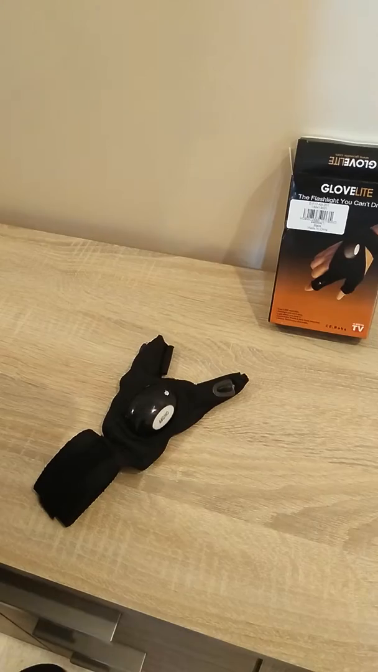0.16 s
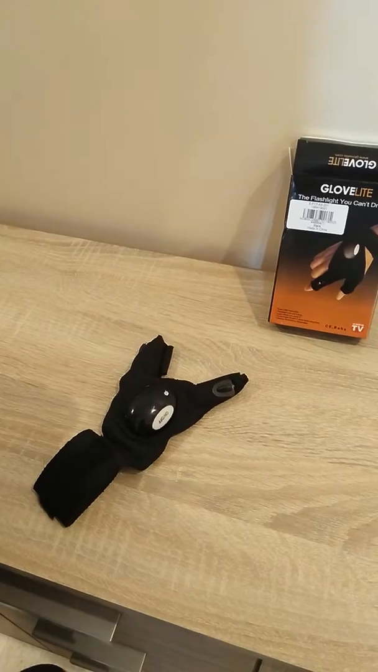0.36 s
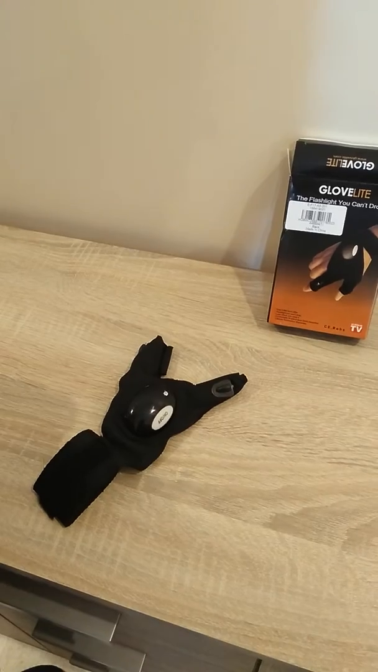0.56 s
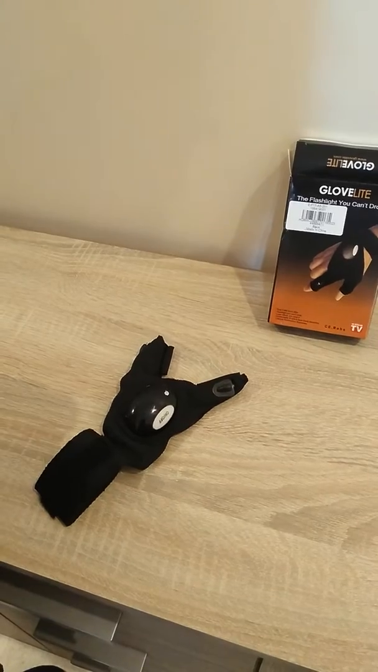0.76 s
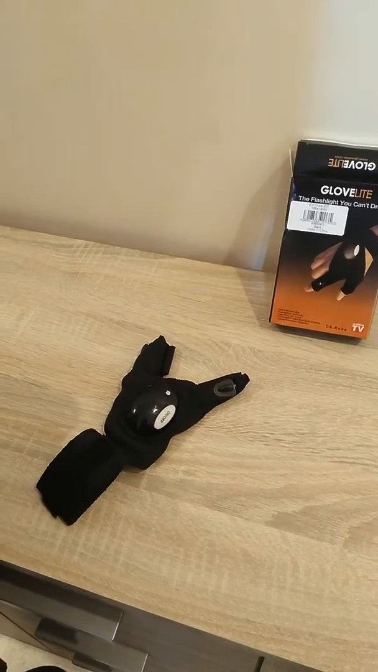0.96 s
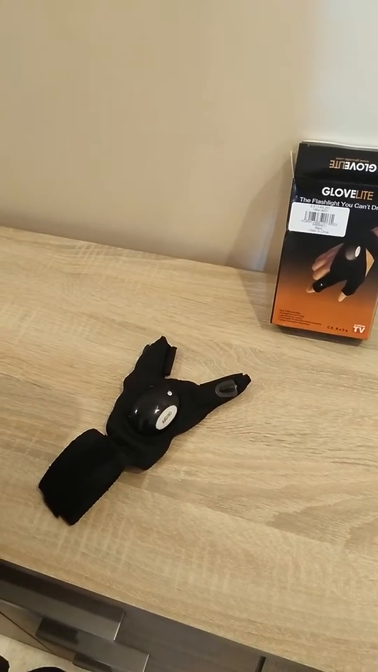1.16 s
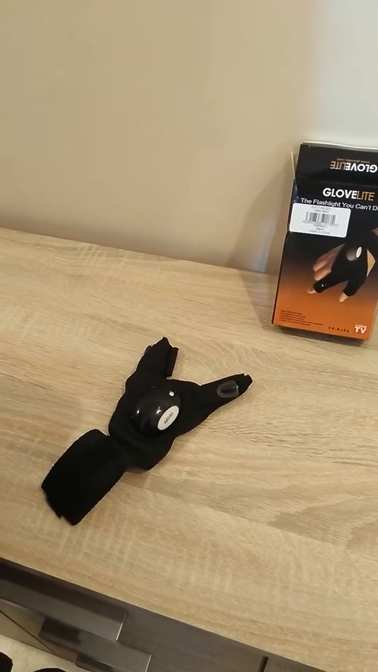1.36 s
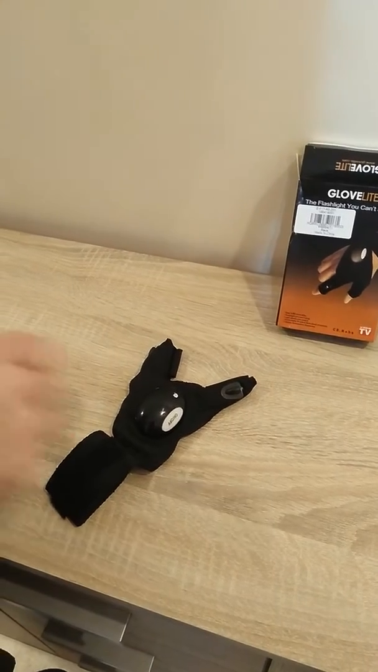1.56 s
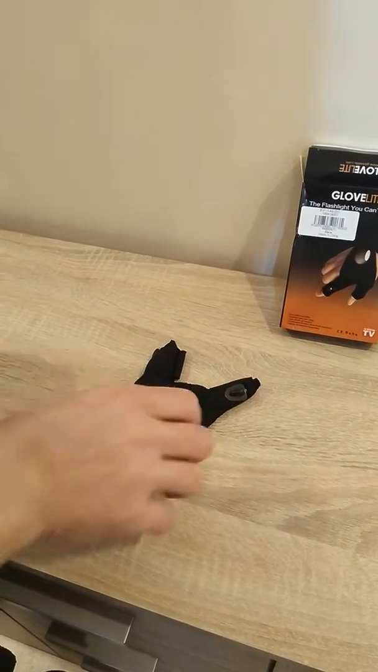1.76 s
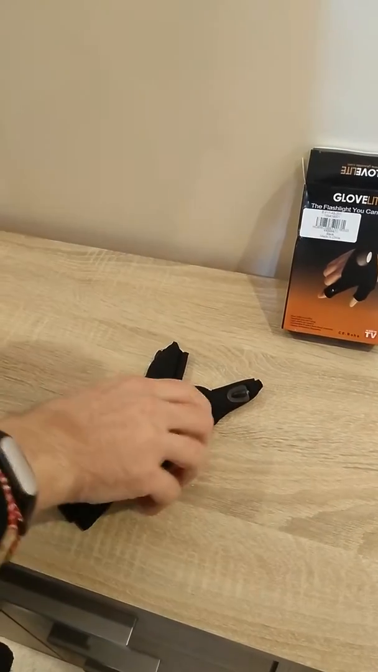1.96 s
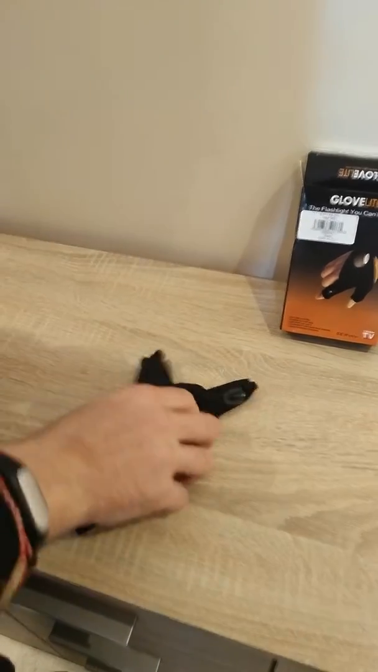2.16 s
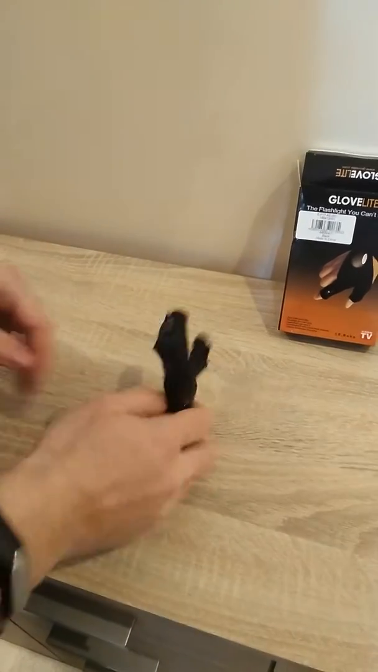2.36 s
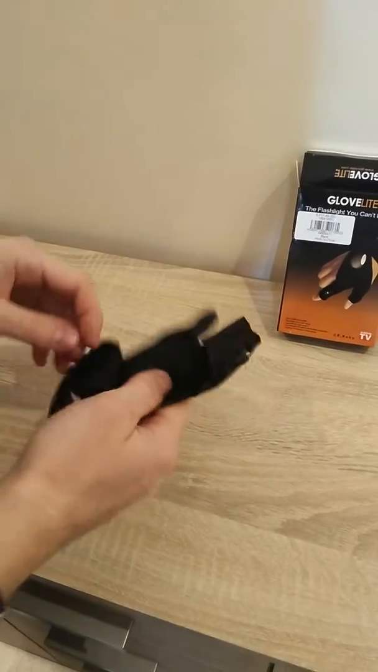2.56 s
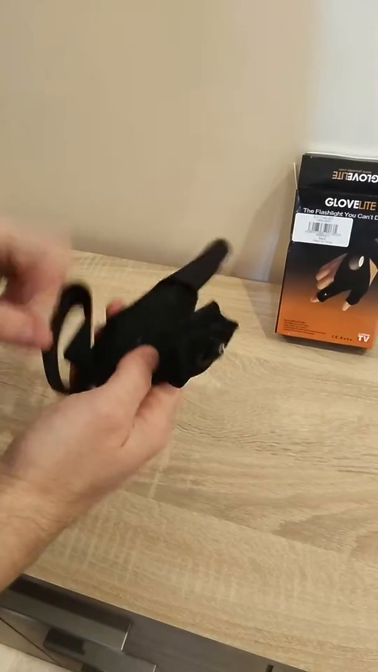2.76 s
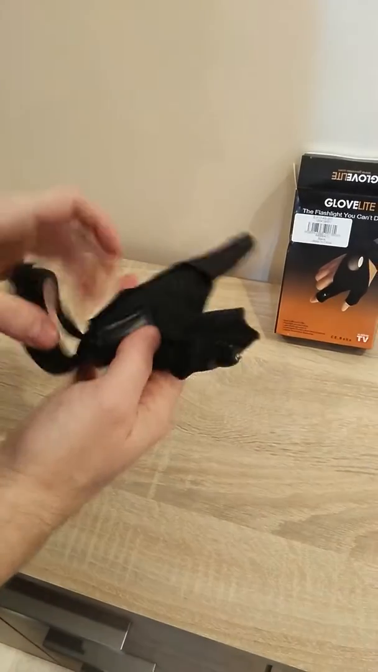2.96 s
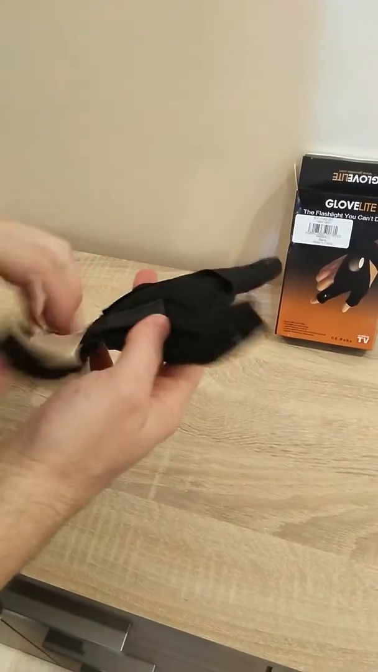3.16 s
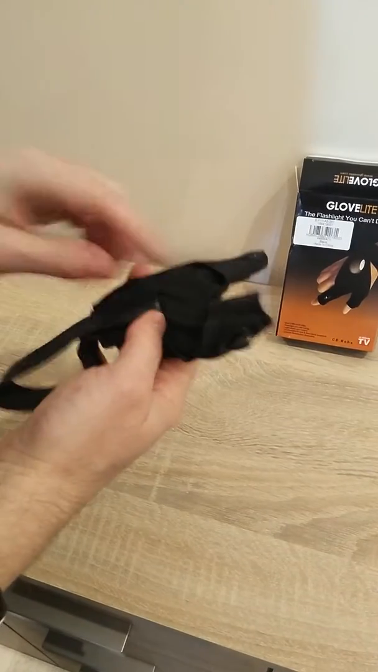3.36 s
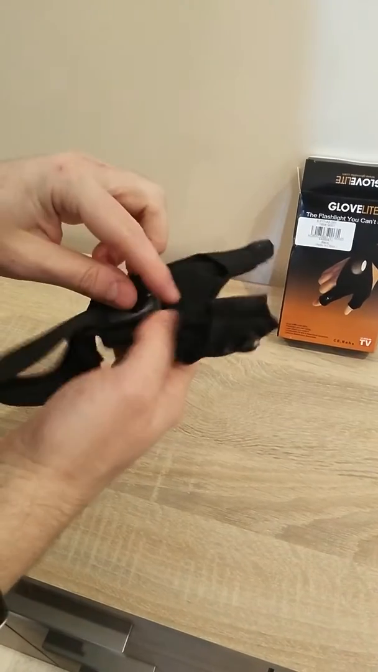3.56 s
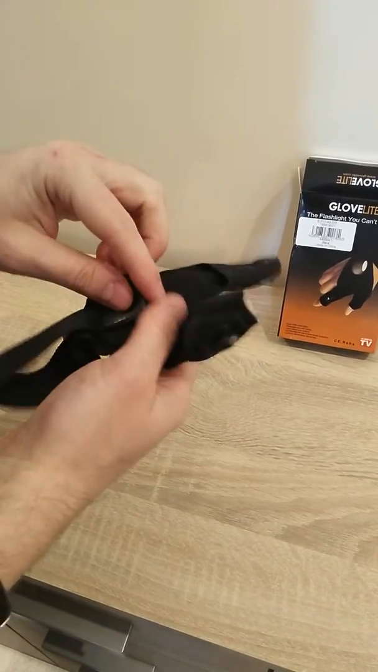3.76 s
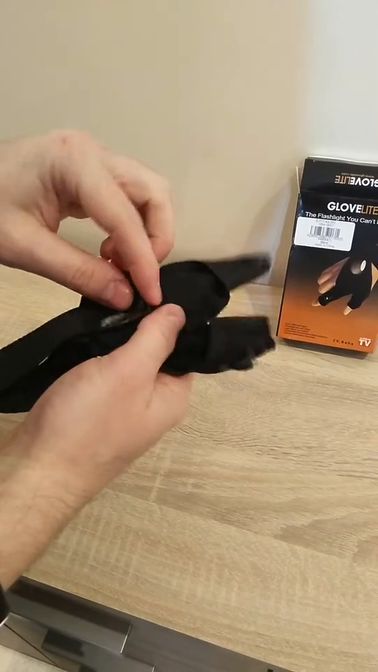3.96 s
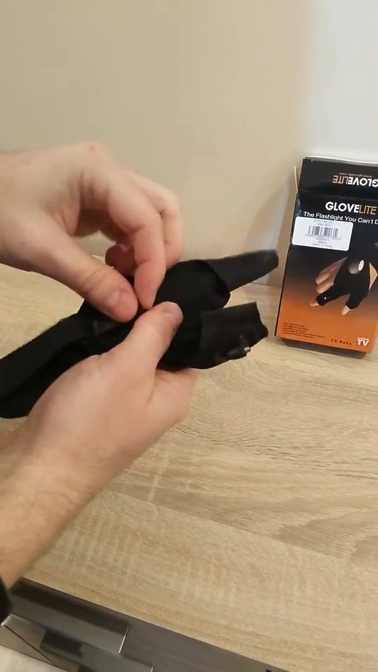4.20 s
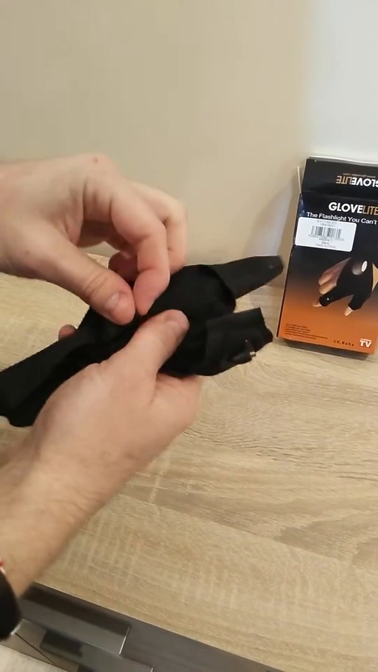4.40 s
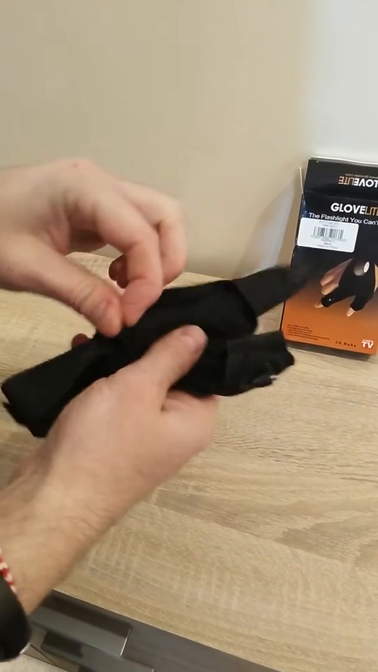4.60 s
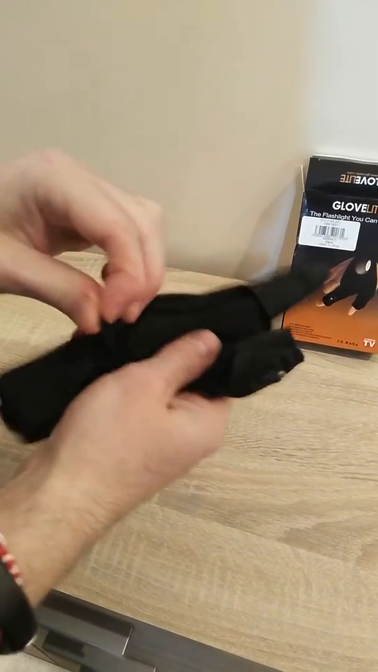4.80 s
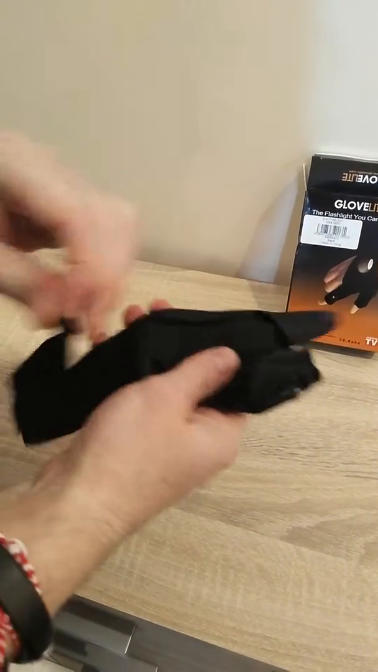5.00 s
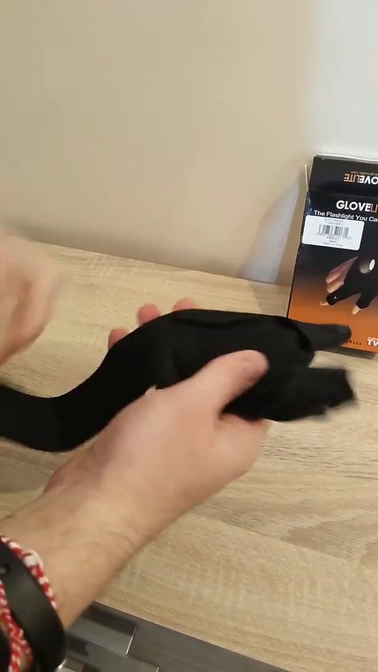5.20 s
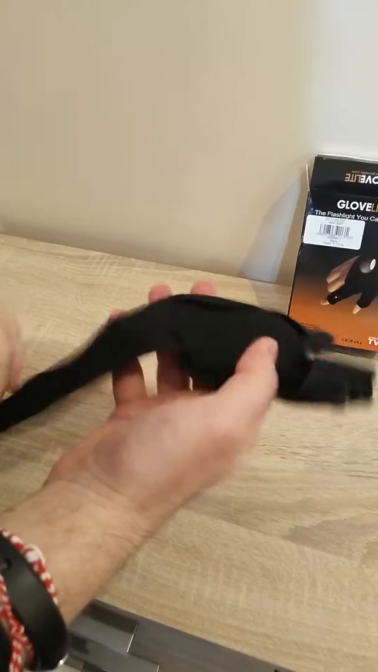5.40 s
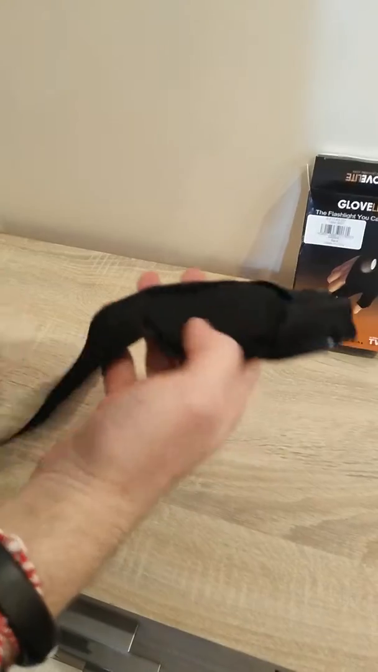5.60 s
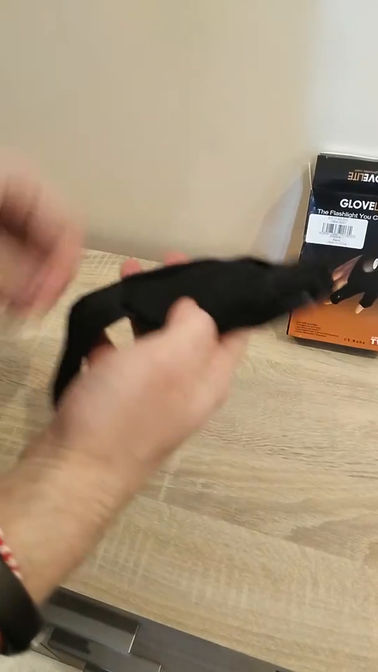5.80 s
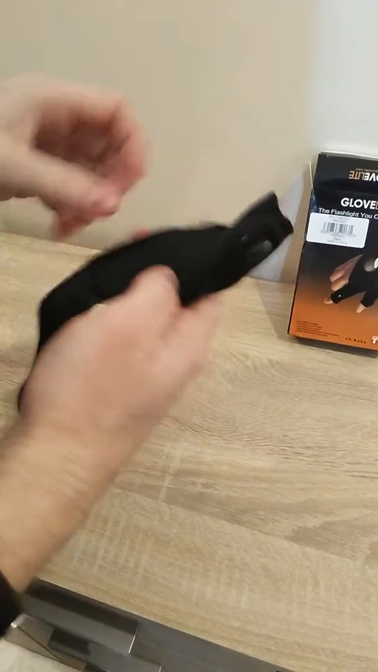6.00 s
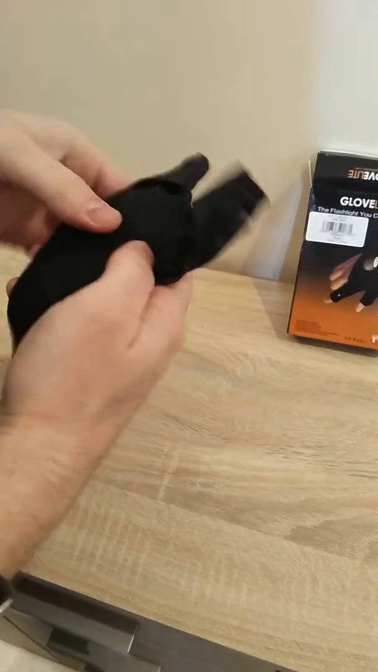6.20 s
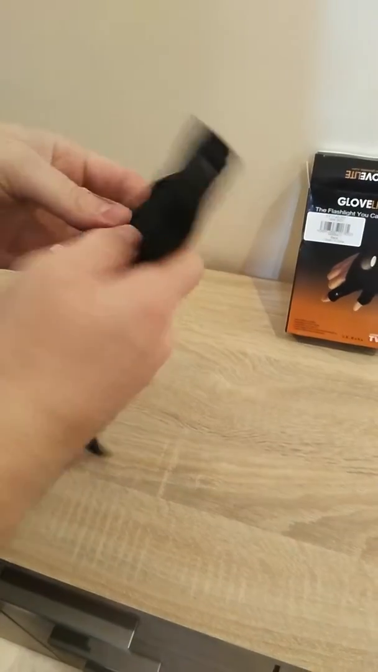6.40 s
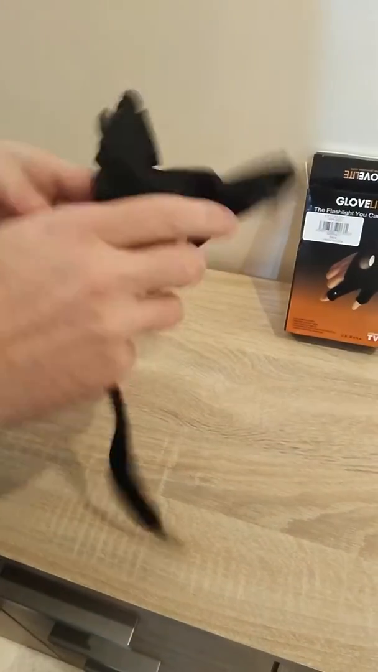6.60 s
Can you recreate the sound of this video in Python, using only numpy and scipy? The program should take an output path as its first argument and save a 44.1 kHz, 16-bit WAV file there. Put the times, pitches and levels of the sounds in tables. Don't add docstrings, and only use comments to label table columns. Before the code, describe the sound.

Close to the microphone in a small quiet room, a cloth glove is handled above a wooden table. Faint rustle and a small plastic click come first, then sliding fabric and a low soft boom as it is picked up. After tiny fingertip crackles, the hook-and-loop strap tears open in three fast, bright, crisp bursts. A short woody knock, light rustling and a last small tick follow over faint low hum and air hiss.

```python
import sys
import numpy as np
from scipy import signal
from scipy.fft import rfft, irfft
from scipy.io import wavfile
from scipy.ndimage import uniform_filter1d, map_coordinates

SR = 44100
rng = np.random.default_rng(int(sys.argv[2]) if len(sys.argv) > 2 else 0)


def int16_out(signal):
    q = np.round(np.clip(np.atleast_2d(signal).T, -1, 1) * 32767)
    wavfile.write(sys.argv[1], SR, q.astype(np.int16))


def undo_db(level):
    steps = np.asarray(level, float) / 20
    return 10 ** steps


N = 293132

# (time [s], shell pitch [factor], shell level [dB], hollow level [dB], thump level [dB])
TICK_EVENTS = [
    (0.965, 1.16, -46.5, -43, -39),
    (1.0496, 0.99, -13.5, -35, -41.5),
    (1.0525, 0.58, -42, -71, -72),
    (1.209, 0.82, -64, -48, -49),
    (1.22, 1.12, -49, -54, -71),
    (2.679, 1.0, -85, -80, -42.5),
    (4.31, 1.0, -85, -80, -45.5),
    (5.555, 1.1, -85, -70, -55),
    (1.7163, 0.98, -36.5, -55, -79),
    (6.6318, 0.88, -40.5, -76, -70),
]


def curves(table):
    s, *columns = np.transpose(table)
    return [np.interp(np.arange(N) / SR, s, c) for c in columns]


def unit(x):
    return x / np.sqrt(np.mean(x ** 2))


def band(x, hz, width, order=1):
    edges = [hz - width / 2, min(hz + width / 2, .45 * SR)]
    return signal.sosfilt(signal.butter(order, edges, "band", fs=SR, output="sos"), x)


def decay(t, t60_s):
    return np.exp(-np.log(1000) * t / t60_s)


def ring(hz, t60_s, rise_s=0.00087):
    t = np.arange(SR // 4) / SR
    return np.sin(2 * np.pi * hz * t) * decay(t, t60_s) * (1 - np.exp(-t / rise_s))


def add(out, s, x):
    i = int(s * SR)
    out[i:i + len(x)] += x[:N - i]


def walk(rate_hz):
    hold = int(SR / rate_hz)
    steps = rng.standard_normal(N // 256)[np.arange(N) // hold]
    return unit(uniform_filter1d(steps, hold))


def swells(table):
    s, db, rise, fall = np.transpose(table)[:, :, None]
    late = np.arange(0, N, 64) / SR - s
    ramp_db = np.where(late < 0, rise * late, -fall * late)
    power = undo_db(2 * (db + ramp_db)).sum(axis=0)
    return np.repeat(10 * np.log10(power), 64)[:N]


def tail(t60_s):
    t = np.arange(SR // 2) / SR
    x = rng.standard_normal(len(t)) * decay(t, t60_s) * (1 - np.exp(-t / 0.0039))
    return x / np.sqrt(np.sum(x ** 2))


def hum(hz, table, waver, flutter_db):
    judder_db = 2.2
    level_db = swells(table) + flutter_db * walk(12) + judder_db * walk(24)
    phase = 2 * np.pi * np.cumsum(hz * (1 + waver * walk(16))) / SR
    return np.sqrt(2) * undo_db(level_db) * np.sin(phase)


def air():
    # (time [s], level [dB])
    air_level = [(0.0, -62), (0.57, -64), (0.94, -63), (1.63, -63), (2.11, -60.5), (3.41, -61.5),
                 (3.92, -61.5), (5.24, -61.5), (5.48, -64), (5.77, -58.5), (5.9, -62), (6.64, -61.5)]
    # (frequency [Hz], density [dB per Hz])
    air_colour = [(35, -18), (60, -4), (70, -8.5), (102, -12), (123, -10.5), (200, -15.5), (223, -20),
                  (299, -12.5), (442, -21.5), (493, -20), (653, -20), (717, -22), (1090, -22.5),
                  (1340, -28.5), (2500, -37), (3250, -43.5), (5500, -120)]
    hz, db = np.transpose(air_colour)
    f = np.maximum(np.arange(N // 2 + 1) * SR / N, 1)
    spectrum = rfft(rng.standard_normal(N)) * undo_db(np.interp(np.log(f), np.log(hz), db))
    low_share = 1 / (1 + (f / 350) ** 4)
    lows = irfft(spectrum * low_share, N) * undo_db(2.2 * walk(14))
    mids = irfft(spectrum * (1 - low_share), N) * undo_db(1.1 * walk(14))
    broad = lows + mids
    return broad / np.std(band(broad, 773, 1468, order=2)) * undo_db(curves(air_level)[0])


def rustle():
    # (time [s], peak level [dB], rise [dB/s], fall [dB/s])
    rubs = [(.1, -51, 32, 84), (.87, -71.5, 30, 31), (1.0, -64.5, 170, 39), (1.36, -60, 73, 65),
            (1.74, -53, 71, 48), (2.04, -54, 32, 61), (2.35, -58.5, 67, 36), (2.54, -55, 67, 26),
            (2.72, -58.5, 30, 120), (3.05, -60.5, 30, 45), (3.39, -60, 122, 21), (3.51, -56, 27, 130),
            (3.87, -60, 39, 46), (4.17, -62.5, 86, 38), (4.4, -62.5, 87, 31.5), (4.53, -45.5, 211, 90.5),
            (4.72, -59, 46.5, 27), (4.87, -54, 62, 98.5), (5.01, -59, 68.5, 36.5), (5.57, -60, 498.5, 108),
            (5.8, -58, 196, 69.5), (6.18, -65, 45, 31.5), (6.55, -58.5, 67, 3)]
    # (frequency [Hz], width [Hz], level [dB])
    cloth = [(9310, 3420, 1), (3120, 5600, 1), (13500, 3500, 1.5)]
    dull_floor_db, dull_db, bright_follow, bright_db = -80, -14, 0.73, -6
    burst_db = 2.0 * np.minimum(rng.exponential(size=N), 6)
    grains = rng.standard_normal((3, N)) * undo_db(burst_db + 1.2 * walk(40) + 0.67 * walk(18))
    db = swells(rubs)
    dull_gain = np.hypot(undo_db(dull_floor_db), undo_db(db + dull_db))
    bright_gain = undo_db(bright_db - 62.5 + bright_follow * (db + 61.0))
    out = np.zeros(N)
    for grain, gain, (hz, width, part_db) in zip(grains, (undo_db(db), dull_gain, bright_gain), cloth):
        out += gain * unit(band(grain, hz, width, order=2)) * undo_db(part_db)
    return out


def slides():
    # (time [s], peak level [dB], rise [dB/s], fall [dB/s])
    strokes = [
        (.12, -65, 35, 140.5),
        (1.78, -66, 196, 34),
        (2.03, -67, 40, 86),
        (2.36, -77, 100, 50),
        (2.51, -63.5, 250, 30.5),
        (2.57, -73.5, 200, 35),
        (2.7, -77, 40, 200),
        (3.45, -72.5, 63, 85),
        (6.52, -78, 49.5, 20),
    ]
    # (frequency [Hz], width [Hz], level [dB])
    table_top = [(1714, 130, -4.5), (2225, 87, -12.5), (2760, 180, -8.5), (3470, 170, -10.5),
                 (4130, 260, -4)]
    rub = rng.standard_normal(N) * undo_db(swells(strokes) + 1.0 * walk(30))
    return sum(undo_db(db) * band(rub, hz, width) * np.sqrt(SR / 4 / width) for hz, width, db in table_top)


def rumble():
    # (time [s], peak level [dB], rise [dB/s], fall [dB/s])
    rumble_swells = [(.19, -43.5, 89, 100), (.38, -42.5, 305, 252), (.65, -58, 500, 202),
                     (.85, -56, 33, 46), (1.069, -48, 598, 125), (1.5, -49, 73, 53), (1.96, -48.5, 86, 61),
                     (2.35, -49.5, 180, 288), (2.48, -56, 298, 158), (2.66, -48, 182, 102),
                     (2.85, -55, 143, 422), (3.16, -53, 44, 65), (3.52, -58.5, 58, 39.5),
                     (3.92, -50, 87, 99), (4.33, -51.5, 175, 103.5), (4.9, -57, 2, 198.5),
                     (5.12, -61, 59, 39.5), (5.37, -57, 403, 146.5), (5.76, -55, 40.5, 25),
                     (6.07, -53.5, 83, 27), (6.39, -51.5, 169, 22)]
    # (time [s], frequency [Hz])
    rumble_hz = [(0.0, 50.86), (0.3, 41.6), (0.6, 41.68), (0.75, 47.84), (6.65, 47.7)]
    return hum(curves(rumble_hz)[0], rumble_swells, waver=.06, flutter_db=1.2)


def sings():
    # (start [s], length [s], frequency [Hz], level [dB])
    tones = [
        (0.352, 0.14, 920, -72),
        (1.582, 0.15, 900, -69.5),
        (1.785, .04, 860, -66),
        (2.04, 0.13, 810, -63),
        (2.2, 0.32, 840, -65),
        (2.401, 0.29, 825, -63),
        (2.701, 0.14, 1087, -67),
        (3.801, 0.26, 1092, -65),
        (4.462, 0.053, 1090, -57),
    ]
    out = np.zeros(N)
    for s, length_s, hz, db in tones:
        tone = unit(band(rng.standard_normal(SR), hz, width=55))[:int(length_s * SR)]
        add(out, s, undo_db(db) * tone * np.sqrt(np.hanning(len(tone))))
    return out


def drone():
    # (time [s], peak level [dB], rise [dB/s], fall [dB/s])
    drone_swells = [(.41, -59.5, 15, 108), (.78, -54, 192, 123), (.98, -57, 380, 496),
                    (1.05, -64, 498, 300), (1.57, -67, 15, 52), (1.87, -56, 198, 93),
                    (2.07, -52.5, 165, 224), (2.35, -75, 120, 68), (2.98, -60.5, 17, 275),
                    (3.13, -57.5, 230, 68), (3.95, -64, 55, 89), (4.851, -64.5, 6.5, 93),
                    (6.201, -65.5, 10, 102), (6.42, -57, 163, 82), (6.65, -68, 107, 94)]
    return hum(95.5, drone_swells, waver=0.0358, flutter_db=3.7)


def hooks():
    # (time [s], peak level [dB], 13 kHz, 7 kHz, 4 kHz rings [dB over the 9 kHz ring])
    first_tug = [(4.4453, -17, 4.5, -14, -17), (4.4523, -32.5, -0.5, -13, -30),
                 (4.4698, -20, 9, -13.5, -17), (4.4714, -32.5, -4, 2.5, -11.5), (4.4754, -22, 2, -8.5, -39),
                 (4.4816, -31, 22.5, 9, -14.5), (4.4899, -31.5, 7.5, 0.5, -17.5),
                 (4.4961, -36, 7, -16.5, -28), (4.498, -50.5, 4.5, 1.5, -18),
                 (4.5019, -11.5, 5, -12.5, -12), (4.5057, -12, 9, -9.5, -26.5), (4.5077, -26, 2, 0.5, -9.5),
                 (4.5096, -20.5, 10.5, -11.5, -16), (4.5147, -21, 17.5, -11, -19),
                 (4.5189, -29, 1, -23.5, -19.5), (4.5205, -14.5, 0.5, -11.5, -21.5),
                 (4.5243, -3.5, 5.5, -5.5, -19.5), (4.5261, -16, 4.5, 8.5, -3), (4.5287, -12, 4, -15, -22),
                 (4.5315, -20.5, -14.5, -5, -16.5), (4.5374, -2.5, -13.5, -12, -20.5),
                 (4.5446, -25.5, 10, -3, 9.5), (4.5467, -9, 3.5, -8, -30), (4.55, -12, -20, -6.5, -23),
                 (4.5576, -33, 1, 9.5, -5), (4.5634, -42, -6, -8, -4.5), (4.5657, -35, -8.5, -16.5, -14.5),
                 (4.5703, -39, -6, 6.5, -6.5), (4.5722, -44, 4, -8, -2), (4.574, -37, -15.5, 0, -20),
                 (4.5757, -35.5, 2.5, -12, -15.5), (4.5777, -34.5, -16.5, -10.5, -14.5),
                 (4.5804, -18, -22, -13, -14), (4.5841, -14, 6, -24, -25.5),
                 (4.5916, -25.5, 25.5, -4.5, -3), (4.5983, -46, -0.5, -19, -13.5),
                 (4.601, -37.5, 18.5, 9.5, -6), (4.603, -34.5, -5, -12, -26)]
    second_tug = [(4.6699, -31.5, 1, -8, -26), (4.674, -35.5, -7, -8, -19.5), (4.676, -39, 20.5, -5.5, -10),
                  (4.68, -33, 1, -7, -24), (4.6819, -50.5, -1.5, -9, -18), (4.685, -27, 4, -8, -20.5),
                  (4.6916, -33, -2, -8.5, -14), (4.693, -30, 14.5, -10, -3), (4.6981, -28, 0, -5, -15),
                  (4.7013, -8.5, -1, -9, -7), (4.7041, -5, 29.5, 2.5, 3), (4.709, -25.5, 8.5, 8, 5),
                  (4.7174, -35.5, -15, -7.5, -15), (4.7192, -47, -3, -6, -3), (4.7276, -14, 5, -24, -37.5),
                  (4.7337, -33.5, 7, -9, 5), (4.7358, -36, -11, -9.5, -13.5),
                  (4.7415, -10, 2.5, -10.5, -13), (4.744, -33, 5.5, -9, -0.5),
                  (4.7488, -38.5, 8, 9.5, -0.5), (4.7586, -38.5, -0.5, 2.5, -2.5),
                  (4.7627, -31.5, 11.5, -2.5, -14), (4.7643, -43, 6, 0.5, -6.5),
                  (4.7771, -30, 5, -6.5, -11.5), (4.781, -52.5, -5, -11.5, -6),
                  (4.7873, -48, -11.5, -17, -20)]
    third_tug = [(4.8337, -24, 5.5, -15, -28), (4.8351, -47, -4, -9.5, -10.5), (4.843, -30.5, 9.5, 5, -9.5),
                 (4.854, -25, 5.5, -3, -9), (4.855, -50, -7.5, -6, 5), (4.8597, -30, -3, -15, 1.5),
                 (4.861, -6, 2, -9, -16.5), (4.8628, -2, -20, -24.5, -17), (4.8682, -15, -2.5, -27, -26),
                 (4.877, -30.5, 13.5, -5, -4), (4.8802, -32, -16, -27, -14.5),
                 (4.8866, -39, -16.5, -22.5, -13.5), (4.8909, -36, -7.5, -8.5, -24),
                 (4.8957, -12.5, 8.5, -20, -21.5), (4.9027, -32, 0, -19, -21),
                 (4.907, -38.5, -11, -19, -25)]
    edge_lift = [(4.332, -44, -14, -16.5, -28), (4.3633, -37, -3, -17, -40), (4.3643, -47, -12, 0.5, -22),
                 (4.377, -47, 3, -26, -26), (4.387, -47, -24, -26, -41), (4.3912, -27.5, 3, -19, -38),
                 (4.3927, -40.5, -4.5, -1, -26), (4.3983, -39.5, 12.5, -19.5, -21),
                 (4.4068, -35.5, 0.5, -21.5, -36.5), (4.4308, -33, 10, -10.5, -34)]
    feeling = [(3.796, -34, -9, -25, -38), (3.8105, -50, -22, -20, -22), (3.8131, -47, -26, -22, -37),
               (3.838, -45, 5, -6, -22), (3.8434, -40, -5, -4, -24), (3.8458, -37.5, 3, -6, -30),
               (3.854, -31, 6, -10, -33), (3.8608, -44, 6, -23, -28), (3.8708, -30.5, 6, 0, -16),
               (3.873, -35.5, -7, -4, -32), (3.8973, -40, 7, -11, -28)]
    stray = [(0.865, -51, -8, -14, -35), (1.34, -49, -4, -16, -35), (1.385, -48, -2, -14, -35),
             (1.43, -48, -2, -10, -30), (1.0522, -33.5, -5, -17, -35), (1.7168, -27, -7, 1.5, -20),
             (4.154, -40.5, 1, -13, -21), (4.175, -44, 3, -12, -30), (4.251, -42.5, -27, -29, -34),
             (4.8967, -17, 6, -9, -22), (5.556, -43, 4.5, -9, -27), (5.574, -40, 6, -15, -31),
             (5.7407, -43.5, -1, -12, -17), (5.778, -45, -3, -14, -35), (5.8, -54, -5, -14, -35),
             (5.7826, -40, 1, -7, -35), (5.7848, -33.5, 7, -15, -39), (5.792, -42, -5, -20, -38),
             (6.5159, -37, -10, -14, -39), (6.6321, -26.5, -8.5, -5.5, -15.5)]
    # (frequency [Hz], width [Hz], level [dB], lag [s], burst length [s])
    hook_rings = [(9740, 1600, -0.5, 0.0, 0.00027), (13320, 3000, -0.5, 0.00026, 0.00031),
                  (6930, 1730, -0.5, 0.00018, 0.00035), (5000, 1900, 2.5, 0.00092, 0.00053),
                  (4180, 1020, -3, 0.0026, 0.00093)]
    # (time [s], 5 kHz ring [dB], 4 kHz ring pitch [factor], lingering ring [dB])
    strap = [(1.7, -8, 0.79, -20), (3.8, -9, 1.0, -20.5), (4.44, -14, 0.93, -18), (4.515, -11.5, 0.87, -6),
             (4.53, -0.5, 0.87, -12), (4.56, 1.5, 1.02, -15.5), (4.585, -5.5, 1.01, -8.5),
             (4.7, 1, 1, -15.5), (4.78, -1, 0.95, -15), (4.83, -0.5, 1.0, -16), (4.87, -3.5, 1.03, -18),
             (6.6, -7, 1.0, -23)]
    linger_t60_s, strap_send_db = 0.04, -4
    send_wider = 1.4

    out, send, t = np.zeros(N), np.zeros(N), np.arange(600) / SR
    rows = first_tug + second_tug + third_tug + edge_lift + feeling + stray + swarms()
    chance = rng.standard_normal((len(rows), len(hook_rings), len(t)))
    s, peak_db, db_13k, db_7k, db_4k = np.transpose(rows)
    base_db = peak_db - np.maximum(0, np.maximum(db_13k, db_7k))
    mid_db, pitch, linger_db = (c[(s * SR).astype(int)] for c in curves(strap))
    shares_db = (0, db_13k, db_7k, db_4k + mid_db, db_4k)
    fade = decay(t, linger_t60_s) * np.hanning(2 * len(t))[len(t):]
    impulse = 1. * (t == 0)

    for k, ((hz, width, db, lag, length), share_db) in enumerate(zip(hook_rings, shares_db)):
        lowest = k == len(hook_rings) - 1
        gains = undo_db(base_db + share_db + db)
        bursts = band(chance[:, k] * t * np.exp(-t / length), hz, width, order=3)
        bursts /= np.abs(bursts).max(axis=1, keepdims=True)
        even = unit(band(impulse, hz, send_wider * width, order=2))
        lingers = unit(band(chance[:, k], hz, 700)) * fade * undo_db(linger_db)[:, None]
        for start, gain, burst, linger, p in zip(s - .0005 + lag, gains, bursts, lingers, pitch):
            add(send, start, gain * np.std(burst) * even * undo_db(strap_send_db * lowest))
            if lowest:
                burst = map_coordinates(burst + linger, [p * t * SR])
            add(out, start, gain * burst)

    jolt = undo_db(1.5) * ring(2900, 0.0061, 0.00026) + undo_db(-1) * ring(1700, 0.0061)
    jolt += undo_db(-7.0) * ring(1100, .012) + undo_db(-5.5) * ring(310.0, 0.016) + undo_db(-7.0) * ring(200, 0.015)
    for start, db in zip(s, peak_db):
        add(out, start, undo_db(db - 31.0) * jolt)
        add(send, start, undo_db(db - 33.5) * jolt)
    return out, send


def ticks():
    # (frequency [Hz], level [dB], t60 [s])
    plastic = [(2400, -13, 0.0048), (2746, -1, 0.0087), (2874, 1.5, 0.0056), (3170, -9, 0.021),
               (3400, -23, 0.034), (3580, -19.5, 0.012)]
    hollow = ring(1076, 0.019, 0.00079) + undo_db(2.5) * ring(610, 0.017, 0.0026)
    hollow += undo_db(3.5) * ring(1190, 0.0084, 0.00099) + undo_db(-9) * ring(1300, 0.0051, 0.00046)
    thump = ring(75.5, 0.14, 0.0015)
    out = np.zeros(N)
    for s, pitch, shell_db, hollow_db, thump_db in TICK_EVENTS:
        shell = np.zeros(SR // 4)
        for k, (hz, db, t60_s) in enumerate(plastic):
            shell += (-1) ** k * undo_db(db) * ring(pitch * hz, t60_s, 0.0012)
        shell = band(shell, pitch * 3050, 2100, order=2)
        add(out, s, undo_db(shell_db) * shell + undo_db(hollow_db) * hollow + undo_db(thump_db) * thump)
    return out


def tick_room():
    # (frequency [Hz], width [Hz], level [dB])
    wall_bands = [(3060, 1270, -42), (1080, 650, -21.5)]
    out, click = np.zeros(N), 1. * (np.arange(600) == 0)
    for s, _, shell_db, hollow_db, _ in TICK_EVENTS:
        for db, (hz, width, room_db) in zip((shell_db, hollow_db), wall_bands):
            add(out, s, undo_db(db + room_db) * unit(band(click, hz, width, order=4)))
    return out


def knocks():
    # (time [s], level [dB], frequency [Hz], t60 [s], low mode [dB])
    hits = [
        (2.051, -31, 252, 0.23, -0.5),
        (5.7407, -25.5, 260.4, 0.076, -24),
        (5.778, -36, 264, 0.091, -18),
    ]
    thuds_db = [-20, -21.5, -18]
    mute_after_s, mute_takes_s, mute_db = .023, .005, -13
    t = np.arange(SR // 4) / SR
    palm = undo_db(mute_db * np.clip((t - mute_after_s) / mute_takes_s, 0, 1))
    thud = undo_db(-2.0) * ring(420, 0.0066) + ring(630, 0.033) + ring(812, 0.058) + ring(1077, 0.038)
    out = np.zeros(N)
    for (s, db, hz, t60_s, low_db), thud_db in zip(hits, thuds_db):
        board = ring(hz, t60_s, 0.0046) + undo_db(-23) * ring(hz, 0.047, 0.0044)
        board -= undo_db(low_db) * ring(129.0, 0.12, 0.014)
        add(out, s, undo_db(db) * (palm * board + undo_db(thud_db) * thud))
    return out


def swarms():
    # (start [s], length [s], first level [dB], last level [dB])
    spells = [
        (3.851, 0.035, -52, -54),
        (4.473, 0.034, -45, -39),
        (4.504, 0.052, -29, -29.5),
        (4.554, 0.039, -36, -43),
        (4.711, 0.036, -36.5, -40.5),
        (4.87, 0.044, -35, -39),
    ]
    scatter_db, rings_db = 3.5, (-3.5, -10, -17.5)
    rows = []
    for s, length_s, first_db, last_db in spells:
        for place in rng.random(7):
            levels_db = np.array([first_db + (last_db - first_db) * place, *rings_db])
            rows.append((s + length_s * place, *(levels_db + scatter_db * rng.standard_normal(4))))
    return rows


def scene():
    # (lag [s], level [dB])
    bounces = [(.0016, -14), (.0037, -15.5), (.0065, -21.5)]
    room_t60_s, room_db, late_t60_s, late_db = 0.099, -13.5, 0.38, -17
    late_top_hz = 6500
    tick_room_db, tick_boom_db, knock_room_db = -26, -12, -15

    (snaps, send), tick, knock = hooks(), ticks(), knocks()
    late = tail(late_t60_s)
    dull_late = signal.lfilter(*signal.butter(1, late_top_hz, fs=SR), late)
    echo = undo_db(room_db) * tail(room_t60_s) + undo_db(late_db) * dull_late
    for lag_s, db in bounces:
        echo[int(lag_s * SR)] += undo_db(db)

    far = undo_db(tick_room_db) * tick + undo_db(tick_boom_db) * band(tick, 1400, 1430, order=2)
    far += tick_room() + undo_db(knock_room_db) * knock
    wet = signal.fftconvolve(send, echo)[:N] + signal.fftconvolve(far, late)[:N]
    steady = air() + rustle() + slides() + rumble() + sings() + drone()
    return (snaps + tick + knock + wet + steady)[None]


def band_limit(x):
    return signal.sosfilt(signal.butter(12, 16820, fs=SR, output="sos"), x)


def record(dry):
    top_hz, skirt_db = 15750, 24
    rounded = np.tanh(1.05 * dry) / 1.05
    bass_cut = signal.butter(2, 24, "high", fs=SR, output="sos")
    top_cut = signal.ellip(6, .3, skirt_db, top_hz, fs=SR, output="sos")
    mix = signal.sosfilt(np.vstack([bass_cut, top_cut]), rounded)
    return band_limit(mix)


dry = scene()
out = record(dry)
int16_out(out)
```